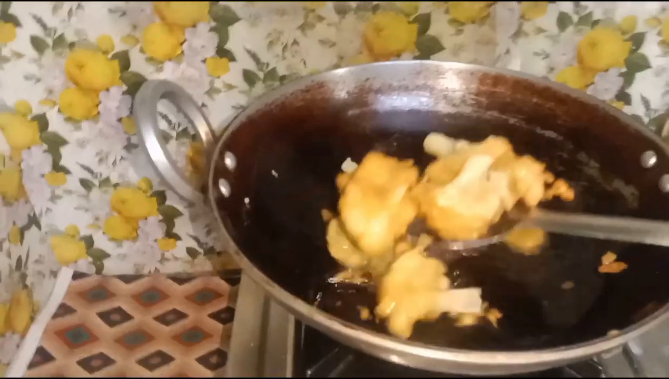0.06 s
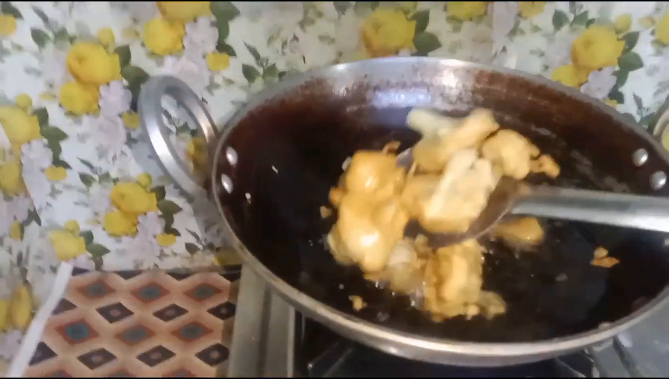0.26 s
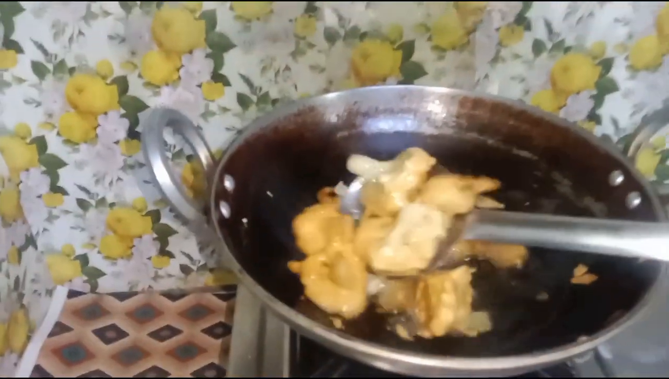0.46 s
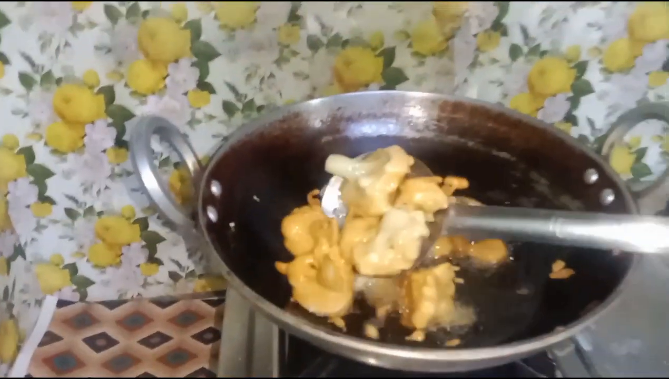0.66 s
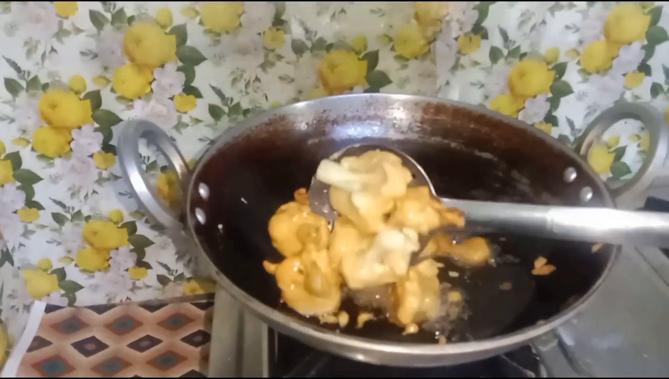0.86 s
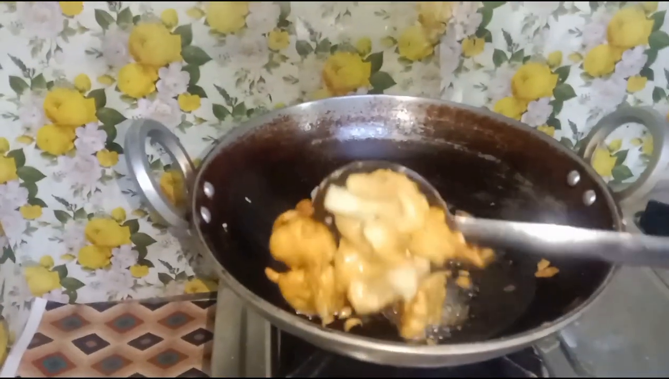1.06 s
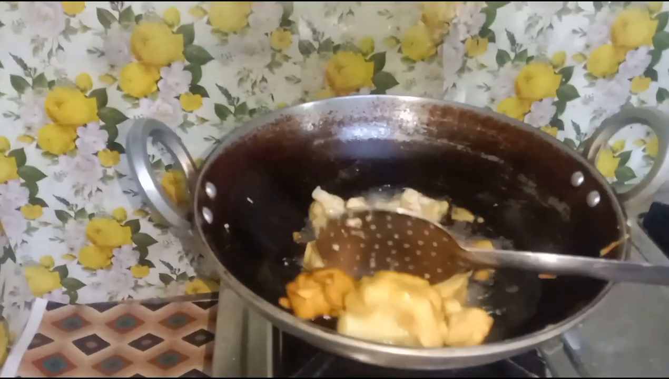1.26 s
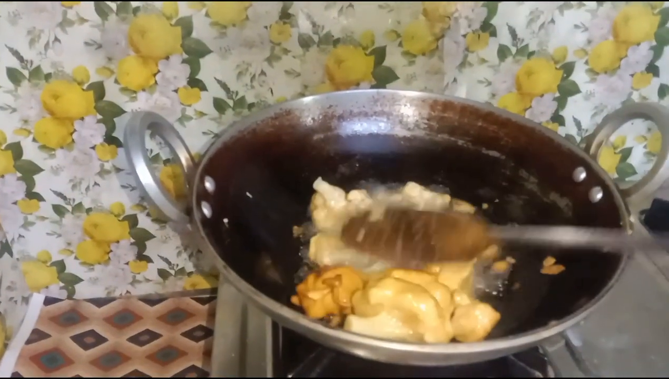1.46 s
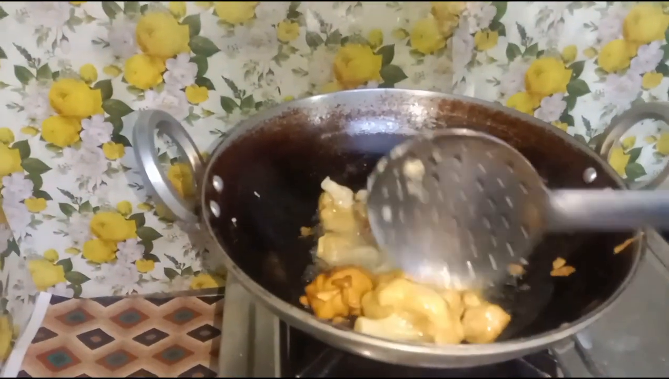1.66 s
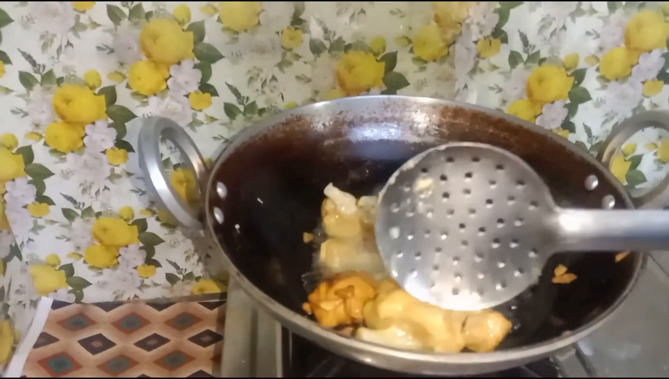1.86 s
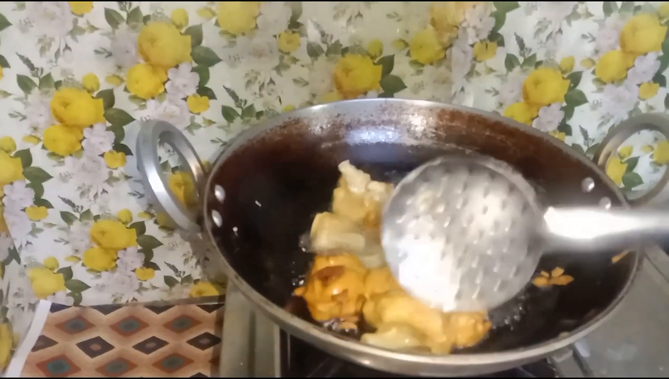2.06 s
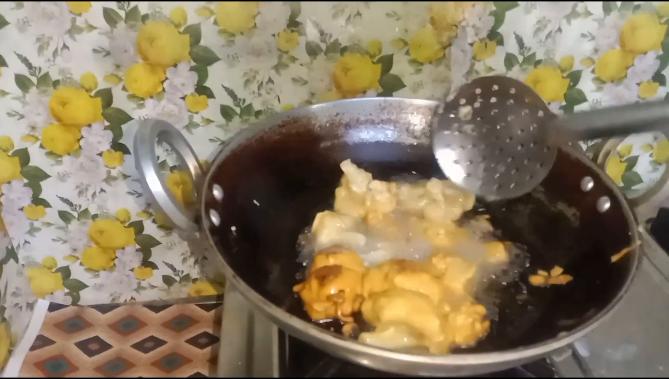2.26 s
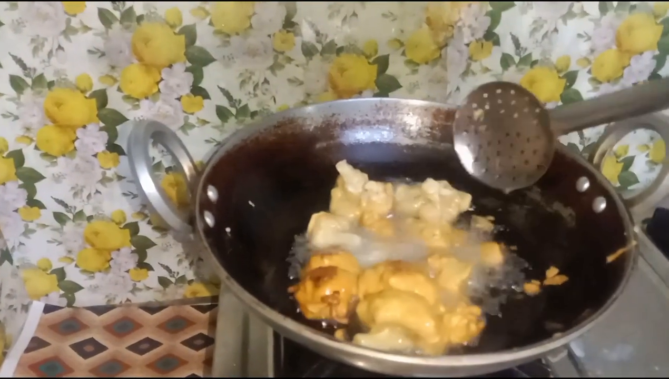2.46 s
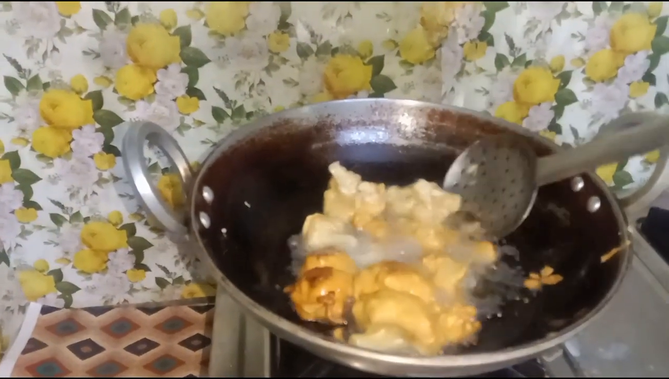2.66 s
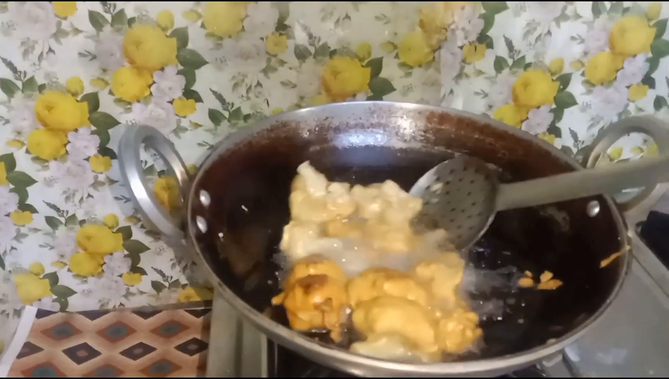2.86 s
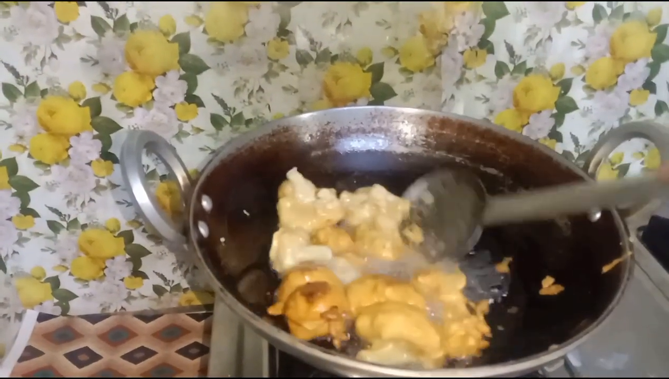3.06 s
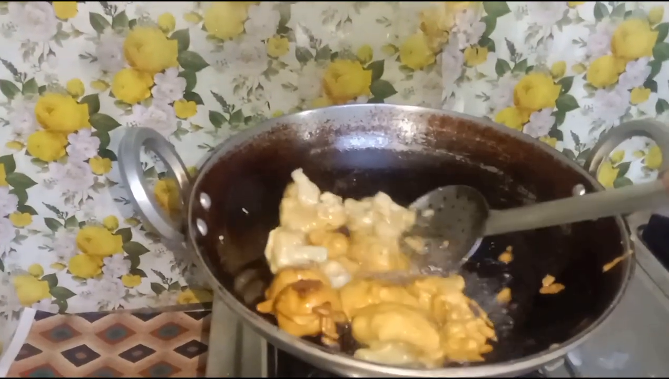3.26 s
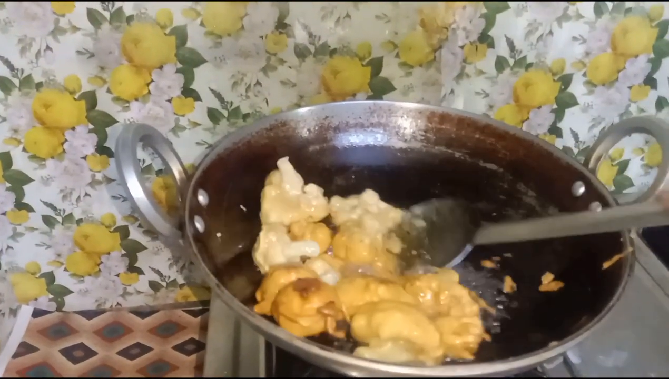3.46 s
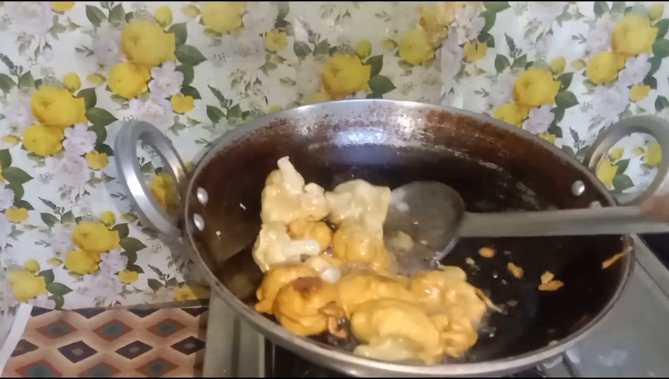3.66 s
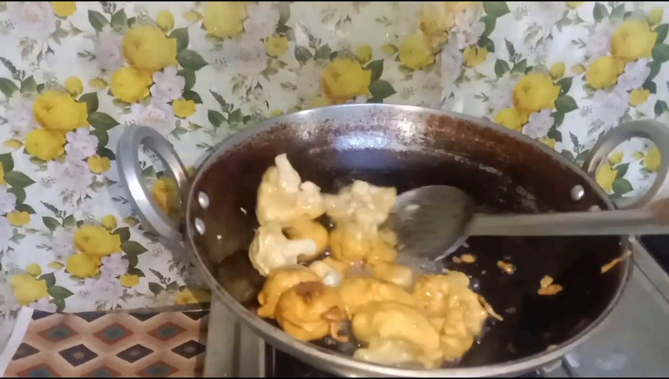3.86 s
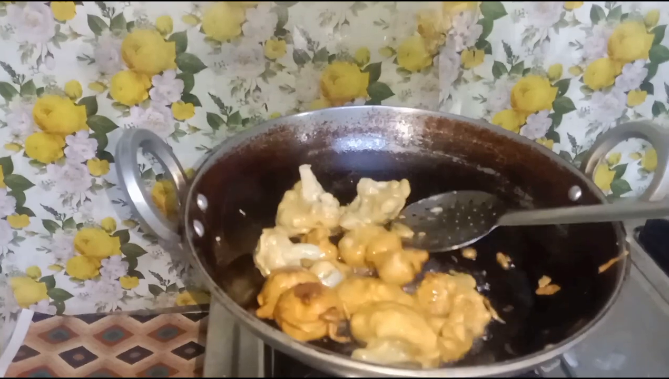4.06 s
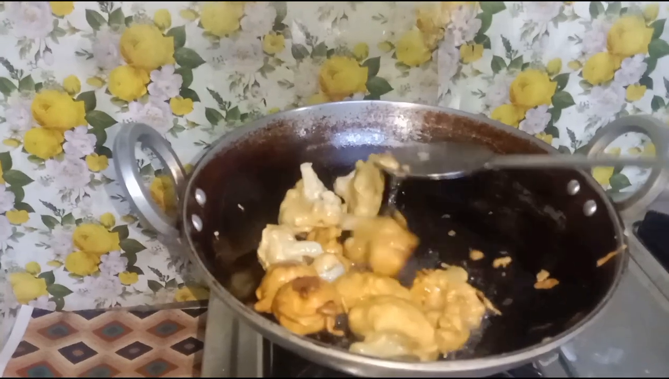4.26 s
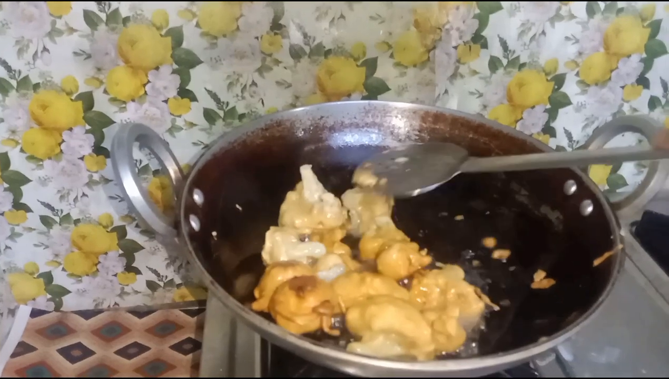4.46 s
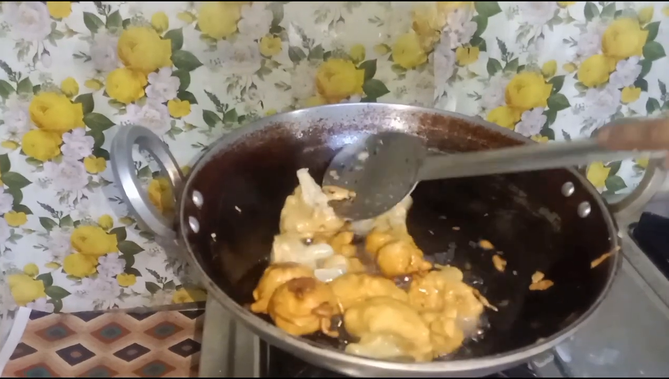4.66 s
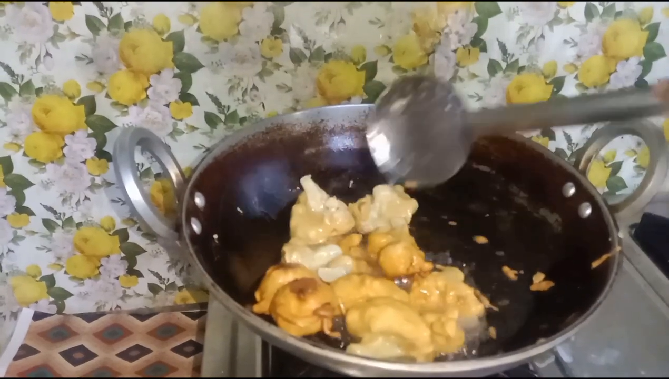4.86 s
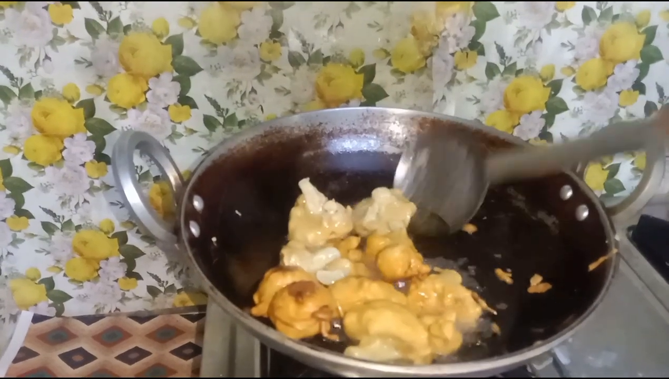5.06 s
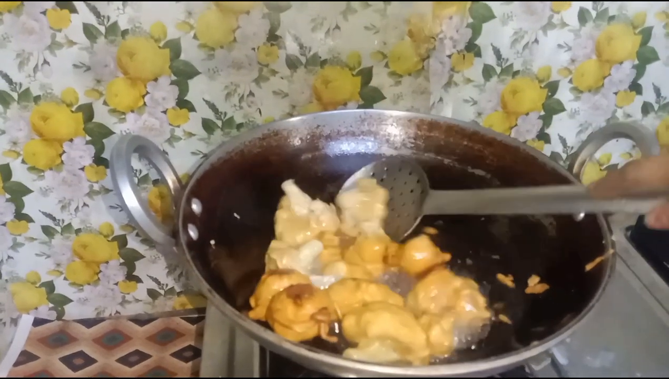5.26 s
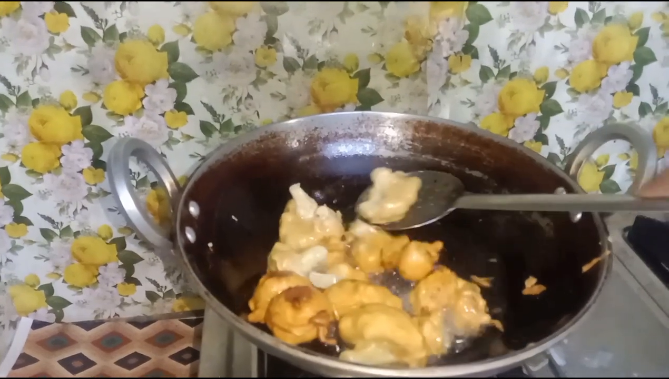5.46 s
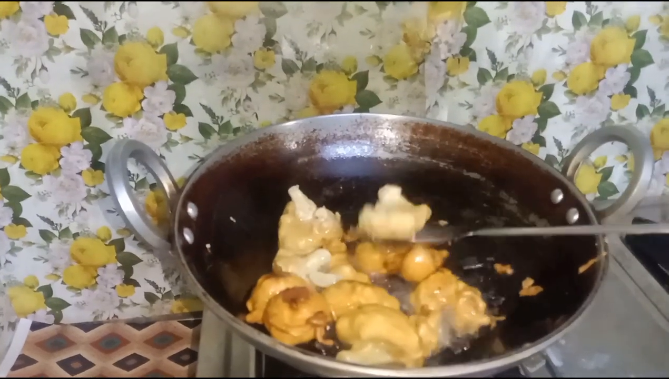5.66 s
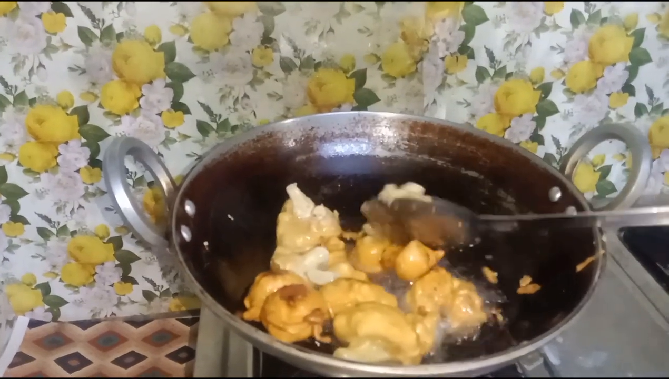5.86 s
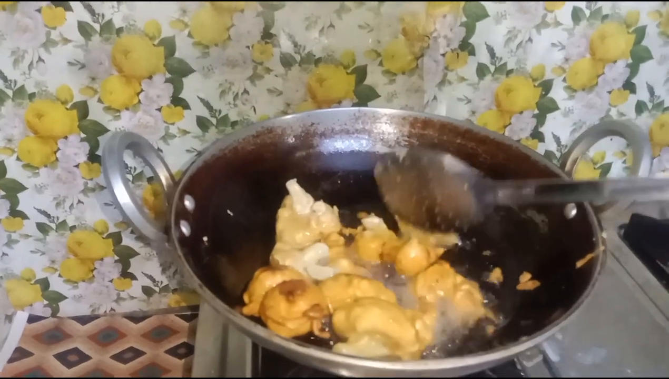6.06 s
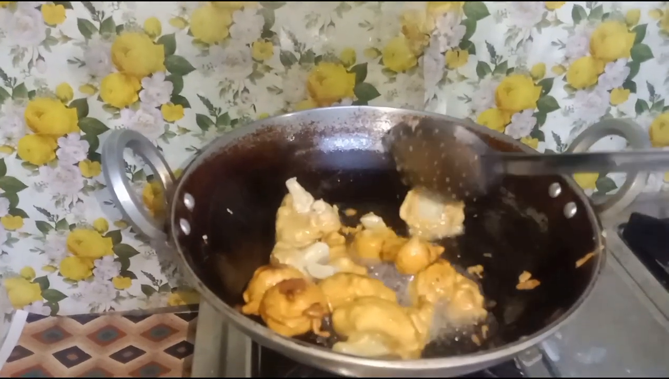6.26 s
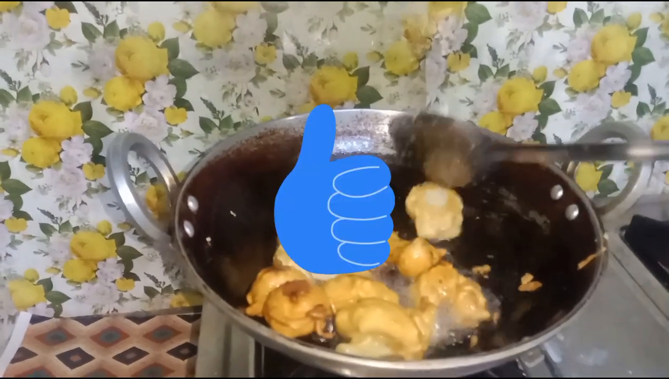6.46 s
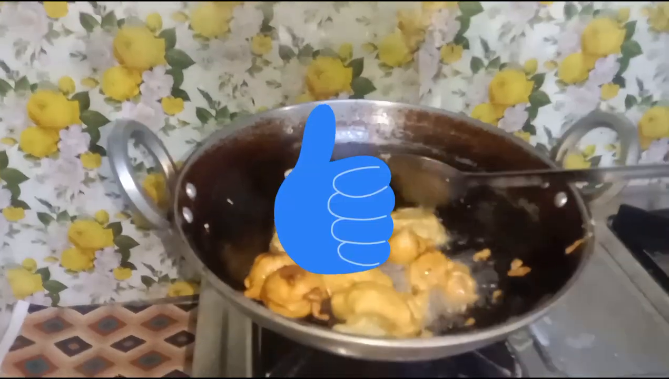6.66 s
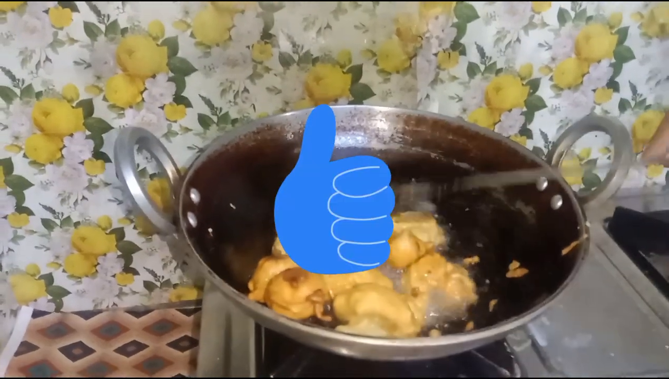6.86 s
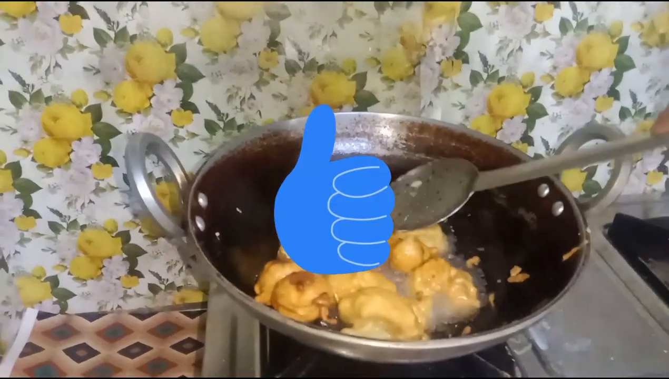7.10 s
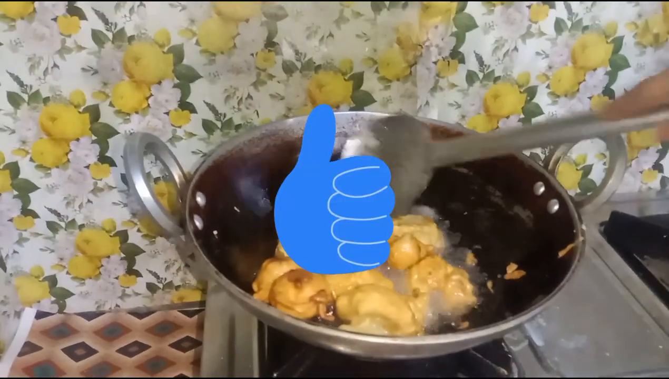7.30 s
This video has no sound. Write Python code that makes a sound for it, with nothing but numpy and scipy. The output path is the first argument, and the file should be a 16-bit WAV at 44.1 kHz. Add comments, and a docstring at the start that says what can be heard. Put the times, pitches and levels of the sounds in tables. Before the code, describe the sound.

Close to a frying wok in a small quiet kitchen: light fizzing and single bubble pops at first, small ladle ticks, then a sudden plunge of wet batter with a gulping, falling gurgle. The frying grows dense and crisp, then holds steady, with uneven bubbling, snapping droplets, soft steel scraping and one thin metallic ting as the ladle moves through the oil.

```python
"""Deep-frying in a steel wok

Battered pieces fry on a kitchen stove, stirred with a slotted ladle. Bubbles pop in calm oil,
then the food slides in with a burst and the sizzle swells. Fizz, boil and gurgle are swarms of
short decaying rings with echoes; larger pops, gulps and spits come one by one over a noise haze.
Ladle strokes stir up gurgles, scrapes and hums from resonant modes; filtered noise is the room tone."""
import sys
import numpy as np
from scipy import signal
from scipy.io import wavfile

SR = 44100
rng = np.random.default_rng(int(sys.argv[2]) if len(sys.argv) > 2 else 0)


def inscribe(sig):
    """Save sig as 16-bit PCM at rate SR to the path in sys.argv[1].

    A 1-D sig is mono; a 2-D sig holds one channel per row.
    Samples are clipped to [-1, 1] before scaling.
    """
    pcm = np.round(np.clip(np.atleast_2d(sig).T, -1, 1) * 32767)
    wavfile.write(sys.argv[1], SR, pcm.astype(np.int16))


N = 323253
TIME = np.arange(N) / SR  # s

# kitchen rumble: [t/s, level/dB], and its colour: [f/Hz, level/dB]
ROOM_LEVEL = [(0, -81), (0.8, -81.5), (1.2, -77.5), (1.5, -75), (7.33, -71)]
ROOM_COLOUR = [(20, -8), (55, -7), (95, 8.5), (140, -11), (176, 7.5), (220, 1), (400, -0.5), (700, 0),
               (1100, -1), (1600, -0.5), (6000, -71)]

# ladle bearing on the wok: [start t/s, length t/s, lowest mode level/dB, second mode level/dB]
RUBS = [(0.063, 0.25, -86, -92), (0.341, 0.044, -100, -67.5), (1.371, 0.075, -50, -70),
        (1.48, 0.052, -61, -83), (2.701, 0.072, -79, -57), (2.833, 0.026, -90, -68),
        (2.943, 0.062, -85, -57), (3.55, 0.044, -67.5, -89), (5.192, 0.013, -52, -59),
        (5.243, 0.03, -60, -54), (5.302, 0.015, -52, -60), (5.394, 0.028, -58, -68),
        (5.653, 0.065, -60, -98)]
# the two modes it sets humming: [f/Hz, width f/Hz]
RUB_MODES = [(176, 5.4), (336, 32)]
RUB_ATTACK_S, RUB_RELEASE_S = 0.032, 0.067  # time to rise and to fall by 20 dB

# strokes of the ladle: [start t/s, length t/s, gurgle level/dB, scrape level/dB], before each layer's trim
STROKES = [(0.076, 0.11, -75, -73), (0.285, 0.025, -65, -79), (0.49, 0.083, -103, -70.5),
           (1.218, 0.034, -64, -70), (1.64, 0.037, -61, -70), (1.922, 0.065, -68, -64),
           (2.397, 0.084, -63.5, -75), (2.696, 0.28, -59, -60.5), (3.06, 0.31, -50.5, -64),
           (3.41, 0.32, -50, -52.5), (3.802, 0.19, -60, -58), (4.103, 0.15, -54, -54),
           (4.46, 0.087, -60.5, -55.5), (4.712, 0.12, -56, -52), (5.125, 0.28, -59, -50),
           (5.627, 0.085, -59, -55), (6.015, 0.04, -65, -55.5), (6.138, 0.12, -65, -56.5),
           (6.772, 0.068, -68, -55), (7.0, 0.032, -77, -61)]
STROKE_ATTACK_S, STROKE_RELEASE_S = 0.074, 0.043  # time to rise and to fall by 20 dB
# colour of the gurgle: [f/Hz, level/dB]
GURGLE_COLOUR = [(200, -14), (450, -9), (530, -14.5), (620, -8.5), (780, 10), (900, -12.5), (1020, 4),
                 (1120, -4), (1400, -4), (2500, -57)]

# wok modes that sing: [f/Hz, level/dB before tilt, t60 t/s]
SINGING_MODES = [(802.4, -1.5, 0.14), (1010, -11, 0.14), (1170, -9.5, 0.06), (1350, 5, 0.12),
                 (1860, -0.5, 0.044), (2140, -2, 0.089)]
STEEL_WAVER_DB = 5.5  # spread of each mode's swelling and fading under the bubbles
# wok modes rung by a knock: [f/Hz, level/dB, t60 t/s]
KNOCK_MODES = [(690, -10, 0.051), (798, 3.5, 0.086), (1210, 6.5, 0.048), (1344, 11.5, 0.05),
               (1660, 2, 0.12), (1870, 17, 0.0093), (2220, -4, 0.26), (2650, 15.5, 0.019)]
# ladle knocking on the wok: [t/s, peak level/dB of the ring]
KNOCKS = [(0.294, -43.5), (0.5885, -35.5), (1.338, -37)]
# blade modes of the ladle: [f/Hz, level/dB, t60 t/s]
LADLE_MODES = [(6700, -3, 0.02), (7500, -1, 0.022), (8150, -2, 0.018), (10890, -7.5, 0.045)]
# the ladle's rim skids on the steel with a thin ting
TING_S, TING_DB, SKID_S = 4.1662, -20, 0.004
# wok resonances laid over every coloured sound: [f/Hz, width f/Hz, boost level/dB]
WOK_RESONANCES = [(810, 26, 3.5), (1190, 38, 3), (1342, 55, 3), (1880, 110, 2), (2052, 38, 2),
                  (2136, 43, 3.5), (2680, 48, 2.5), (3390, 60, 3), (3580, 80, 2), (3754, 65, 3),
                  (4147, 70, 2), (4295, 22, 3.5), (5156, 32, 3), (7516, 80, 2)]

# colour of the crumbs' crackle: [f/Hz, level/dB]
CRUMB_COLOUR = [(1500, -27), (2500, -24), (3300, -5), (8700, -1), (9300, -7), (12800, -15), (15300, -12)]
# sharp spits of oil: [t/s, peak level/dB], and their colour: [f/Hz, level/dB]
SPITS = [(2.1609, -18.5), (2.2738, -13), (2.3665, -19), (2.4208, -19), (5.7339, -12.5), (5.9455, -21),
         (6.9972, -15)]
SPIT_COLOUR = [(800, -20.5), (2500, -7), (5000, 7), (8500, 10.5), (9500, -1), (12000, -6), (15500, -5)]
# largest pockets of steam gulping under food and ladle: [t/s, peak level/dB, pitch f/Hz]
GULPS = [(1.375, -47, 1135), (1.4, -47, 1030), (2.375, -53, 1004), (2.785, -58, 730), (2.725, -55, 735),
         (2.9, -53, 1000), (3.055, -57, 700), (3.15, -53, 720), (3.225, -56, 700), (3.275, -57, 447),
         (3.29, -55, 693), (3.3, -46.5, 1000), (3.335, -61, 557), (3.41, -55, 754), (3.46, -50, 990),
         (3.49, -58, 608), (3.56, -57, 690), (3.645, -49.5, 593), (3.69, -56, 607), (3.85, -58, 980),
         (4.22, -48, 1094), (4.23, -59, 690), (4.25, -62, 443), (4.49, -53.5, 698), (4.535, -52.5, 762),
         (4.55, -59, 1010), (4.665, -54, 966), (5.591, -46, 1050), (5.615, -57, 930), (5.645, -50, 796),
         (6.12, -55, 1060), (6.225, -59, 795)]
# largest bubbles bursting: [t/s, level/dB of the onset before trim and colour, pitch f/Hz]
POPS = [(0.083, -39, 2710), (0.118, -25, 5150), (0.2266, -33.5, 3200), (0.2733, -35.5, 4200),
        (0.292, -33.5, 3540), (0.338, -33, 6860), (0.4493, -35.5, 4500), (0.639, -29, 4360),
        (0.645, -29, 4470), (0.811, -46, 3500), (0.8787, -27, 4000), (0.938, -34.5, 6640),
        (1.0668, -34.5, 7500), (1.144, -31.5, 2760), (1.194, -25.5, 4570), (1.212, -28.5, 5170),
        (1.2323, -30.5, 5500), (1.323, -37, 4300), (1.342, -21.5, 3730), (1.3733, -17.5, 4230),
        (1.395, -21.5, 6840), (1.429, -18, 4500), (1.468, -23, 2650), (1.507, -22.5, 5400),
        (1.532, -23, 7200), (1.684, -29, 2980), (1.702, -28.5, 5940), (1.787, -32, 2900),
        (1.9025, -31, 6100), (1.9224, -23, 4240), (2.055, -31, 5200), (2.16, -17.5, 2950),
        (2.471, -25, 4840), (2.5007, -28, 7400), (2.521, -23, 3770), (2.623, -23, 3500), (2.659, -25, 7600),
        (2.7944, -25, 4620), (2.829, -26, 3500), (2.9328, -24, 3900), (3.033, -28, 3010),
        (3.278, -23.5, 4580), (3.34, -28, 2690), (3.375, -21, 4000), (3.391, -21, 4400), (3.455, -24, 3430),
        (3.5508, -18, 2610), (3.669, -24.5, 3480), (3.736, -25, 3850), (3.904, -25, 5360),
        (3.968, -27.5, 3440), (4.063, -24.5, 3540), (4.384, -27, 7650), (4.404, -28, 2640),
        (4.544, -26, 3120), (4.654, -28, 3580), (4.709, -24.5, 3770), (4.728, -20.5, 3530),
        (4.91, -28, 3240), (4.9973, -26, 4520), (5.164, -22.5, 3260), (5.1933, -23.5, 4600),
        (5.3292, -19, 4450), (5.359, -24.5, 4550), (5.442, -30, 3460), (5.5112, -24, 2220),
        (5.5274, -23.5, 2120), (5.574, -27.5, 4580), (5.6468, -17.5, 2720), (5.7, -26, 3500),
        (5.9452, -20, 3700), (6.173, -28, 3520), (6.339, -29, 2600), (6.4416, -24, 2780),
        (6.664, -28, 2620), (6.709, -25, 5260), (6.802, -23, 4000), (6.82, -28, 3100), (6.8785, -25, 6760),
        (6.948, -24.5, 5260), (6.996, -26.5, 2480), (7.131, -27, 3600), (7.1497, -20.5, 4580)]
# colour of pops and knock ticks: [f/Hz, level/dB]
POP_COLOUR = [(1000, -1.5), (8800, -0.5), (9300, -12), (15000, 0)]

# larger bubbles round the food: [t/s, level/dB], and their colour: [f/Hz, level/dB]
BOILING = [(1.3, -92), (1.38, -46.5), (1.7, -55.5), (2.0, -62.5), (2.3, -52), (2.44, -47), (2.53, -56),
           (2.7, -47.5), (3.0, -53), (3.15, -48), (4.2, -44.5), (4.35, -49), (4.45, -47.5), (5.0, -46),
           (5.8, -45.5), (6.25, -50), (6.55, -46.5), (7.33, -47)]
BOIL_COLOUR = [(600, -25), (980, -17), (1200, 1), (1550, 5.5), (2100, 7), (2700, 7), (3300, -1),
               (4000, -21), (8000, -45)]
BOIL_GUSH_DB = 6  # how unevenly the largest of them come
# how hard the oil works: [t/s, level/dB of the fizz before trim]
FRYING = [(0.0, -66.5), (0.06, -52.5), (0.3, -49), (0.4, -58), (0.75, -55.5), (1.05, -54.5), (1.23, -48.5),
          (1.29, -51), (1.34, -49), (1.43, -38.5), (1.75, -44), (2.12, -41), (2.3, -36), (2.63, -33.3),
          (2.88, -32.3), (3.2, -34.5), (3.8, -36), (4.1, -36), (4.59, -37), (5.41, -35), (6.0, -37.5),
          (6.65, -36), (7.33, -37)]
# colour of the fizz: [f/Hz, level/dB]
FIZZ_COLOUR = [(1000, -74), (2200, -15.5), (2650, -9), (3100, -3), (3600, -3), (5100, -0.5), (6200, -3),
               (7400, 0.5), (8850, -4), (9200, -13.5), (10400, -12), (11500, -17.5), (12700, -13.5),
               (13900, -20), (15300, -12.5)]

# wet batter slides in: the burst starts at once, swells to its top and dies away
PLUNGE_S, PLUNGE_SWELL_S = 1.324, 0.098
PLUNGE_RISE_DB_PER_S, PLUNGE_FALL_DB_PER_S = 168, 235
EDGE_HZ = 15700  # top of the audible band


def gain_of(db):
    """Decibels to amplitude."""
    return 10 ** (np.asarray(db) / 20)


def evened(x):
    """Scales to an rms of one."""
    return x / np.sqrt(np.mean(x ** 2) + 1e-20)


def level(rows):
    """Gain over time from a dB curve."""
    return gain_of(np.interp(TIME, *np.transpose(rows)))


def add(mix, s, sound):
    """Mixes a sound in at a time."""
    part = mix[max(round(s * SR), 0):][:len(sound)]
    part += sound[:len(part)]


def coloured(x, points, size=4096):
    """Minimum-phase filter with a given spectrum plus the resonances of the wok."""
    hz = abs(np.fft.fftfreq(size, 1 / SR))
    f, colour_db = np.transpose(points)
    db = np.interp(np.log(hz + 1), np.log(f), colour_db)
    for centre, width, boost in WOK_RESONANCES:
        db = db + boost / (1 + (2 * (hz - centre) / width) ** 2)
    log_spectrum = np.conj(signal.hilbert(np.log(gain_of(db))))
    taps = np.fft.ifft(np.exp(log_spectrum)).real
    return signal.oaconvolve(x, taps)[:len(x)]


def echoes(near_db, room_db, near_t60=0.059, room_t60=0.2, size=8000):
    """Direct sound, quick reflections from the wok and wall, then the kitchen's tail."""
    t = np.arange(size) / SR
    sparse = rng.standard_normal((2, size)) * (rng.random((2, size)) < .12) * (t > .0007)
    near = sparse[0] * 1e-3 ** (t / near_t60)
    room = sparse[1] * 1e-3 ** (t / room_t60)
    near = gain_of(near_db) * near / np.linalg.norm(near)
    room = gain_of(room_db) * room / np.linalg.norm(room)
    return (t == 0) + near + room


def bubble(hz, cycles, rise=0.025):
    """A bursting bubble: its cavity swells into a decaying ring, rising in pitch as it opens."""
    age = np.arange(0, 10, hz / cycles / SR)
    phase = 2 * np.pi * cycles * (age + rise * age ** 2 / 2)
    ring = age * np.exp(-age) * np.sin(phase)
    return ring / np.linalg.norm(ring)


def bursts(per_s, spread_db, limit=4):
    """Random impulses: many small ones and a few large."""
    draws, train = rng.random((int(per_s * N / SR), 3)), np.zeros(N)
    size = gain_of(spread_db * np.minimum(-np.log(1 - draws[:, 1]), limit))
    train[(draws[:, 0] * N).astype(int)] = size * np.sign(draws[:, 2] - .5)
    return train


def surge(depth_db, per_s):
    """Uneven gushes: a random gain that wanders smoothly in dB."""
    knots = rng.standard_normal(2000)
    return gain_of(depth_db * np.interp(TIME * per_s, np.arange(len(knots)), knots))


def swarm(per_s, spread_db, cycles, low_hz, high_hz, near_db, room_db,
          gush_db=0, gush_per_s=10, count=28):
    """Bubbles of many sizes, each size with its own echoes and gushes, the largest most unevenly."""
    out = np.zeros(N)
    for hz in np.linspace(low_hz, high_hz, count):
        grain = evened(signal.fftconvolve(bubble(hz, cycles), echoes(near_db, room_db)))
        gushes = surge(gush_db * (low_hz / hz) ** .8, gush_per_s)
        train = bursts(per_s / count, spread_db) * evened(gushes)
        out += signal.oaconvolve(train, grain)[:N]
    return evened(out)


def scatter(drive, over_db, spread_db, low_hz, high_hz, count):
    """Chance bubbles (t/s, level/dB, pitch f/Hz), one per equal stretch, their level following a drive."""
    when, size, pitch = rng.random((count, 3)).T
    s = (np.arange(count) + when) * N / SR / count
    db = 20 * np.log10(np.interp(s, TIME, drive)) + over_db - spread_db * size
    return list(zip(s, db, low_hz * (high_hz / low_hz) ** pitch))


def gesture(start, length, attack_s, release_s):
    """Gain over time of one move of the ladle: it rises, holds and dies away."""
    early = np.maximum(start - TIME, 0)
    late = np.maximum(TIME - start - length, 0)
    return gain_of(-20 * np.minimum(early / attack_s + late / release_s, 10))


def stirring(axis):
    """How strongly the ladle moves the oil (axis 0) or scrapes the steel (axis 1)."""
    power = np.zeros(N)
    for s, length, *dbs in STROKES:
        power += (gain_of(dbs[axis]) * gesture(s, length, STROKE_ATTACK_S, STROKE_RELEASE_S)) ** 2
    return np.sqrt(power)


def bearing(axis):
    """How strongly the ladle drives one of the wok's two low modes."""
    return sum(gain_of(dbs[axis]) * gesture(s, length, RUB_ATTACK_S, RUB_RELEASE_S)
               for s, length, *dbs in RUBS)


def plunge():
    """Gain over time of the burst as the batter goes in, one at its top."""
    past_top = TIME - PLUNGE_S - PLUNGE_SWELL_S
    db = np.minimum(PLUNGE_RISE_DB_PER_S * past_top, -PLUNGE_FALL_DB_PER_S * past_top)
    return (TIME > PLUNGE_S) * gain_of(db)


def kitchen():
    """The faint rumble of the stove and the room, as coloured noise."""
    return evened(coloured(rng.standard_normal(N), ROOM_COLOUR)) * level(ROOM_LEVEL)


def thuds(thud_db=-12, low_hz=65, high_hz=300):
    """The wok jostles on its stand whenever the ladle bears on it: low-passed random knocks."""
    band = signal.butter(2, [low_hz, high_hz], "band", fs=SR, output="sos")
    jostle = evened(signal.sosfilt(band, bursts(per_s=380, spread_db=5.5)))
    return gain_of(thud_db) * jostle * bearing(axis=0)


def rubs(judder=0.27, slip_band=(.72, 1.3)):
    """Friction of the ladle keeps two low modes of the wok humming unevenly."""
    out = np.zeros(N)
    for k, (hz, width) in enumerate(RUB_MODES):
        # irregular slips make the phase of the mode wander
        r = np.exp(-np.pi * width / SR)
        noise = rng.standard_normal(N) + 1j * rng.standard_normal(N)
        drift = signal.lfilter([1], np.poly([r, r]), noise)
        steadied = drift / (abs(drift) + abs(drift).mean() / 10)
        hum = evened((steadied * np.exp(2j * np.pi * hz * TIME)).real)
        band = signal.butter(2, hz * np.array(slip_band), "band", fs=SR, output="sos")
        slips = signal.sosfilt(band, bursts(per_s=310, spread_db=2.5))
        out += (hum + judder * evened(slips)) * bearing(axis=k)
    return out


def steel(tilt_db, waver_db, size=6000):
    """Countless small taps keep the wok's modes ringing, each wavering by itself; tilt is per octave."""
    t, out = np.arange(size) / SR, np.zeros(N)
    for hz, db, t60 in SINGING_MODES:
        ring = gain_of(-60 * t / t60) * np.sin(2 * np.pi * hz * t)
        tapped = signal.oaconvolve(bursts(per_s=400, spread_db=3), ring)[:N]
        ringing = evened(tapped * surge(waver_db, per_s=11))
        out += gain_of(db + tilt_db * np.log2(hz / SINGING_MODES[0][0])) * ringing
    return evened(out)


def singing(singing_db=-22, scrape_db=-2):
    """The wok sings faintly under the bursting bubbles, and lower and louder where the ladle scrapes it."""
    bubbled = gain_of(singing_db) * level(FRYING) * steel(tilt_db=12, waver_db=STEEL_WAVER_DB)
    waves = evened(surge(depth_db=2, per_s=14))
    scraped = gain_of(scrape_db) * stirring(axis=1) * steel(tilt_db=-2.0, waver_db=2.0)
    return bubbled * waves + scraped


def knocks(tick_db=1, contact_s=0.0006, size=12000):
    """The ladle's edge ticks on the steel and rings the wok, damped by the oil."""
    out, t = np.zeros(N), np.arange(size) / SR
    for s, peak_db in KNOCKS:
        ring = np.zeros(size)
        for hz, db, t60 in KNOCK_MODES:
            ring += gain_of(db) * 1e-3 ** (t / t60) * np.sin(2 * np.pi * (hz * t + rng.random()))
        ring = signal.fftconvolve(ring * np.minimum(t / contact_s, 1), echoes(near_db=-2, room_db=1))
        tick = coloured(echoes(near_db=-4, room_db=-12), POP_COLOUR)
        add(out, s, gain_of(peak_db) * ring / abs(ring).max())
        add(out, s, gain_of(peak_db + tick_db) * tick / abs(tick).max())
    return out


def ting(skid_db=1.5, size=6000):
    """A short skid of tiny slips rings the thin blade of the ladle."""
    out, t = np.zeros(N), np.arange(size) / SR
    slips = rng.standard_normal(size) * t / SKID_S * np.exp(-2 * t / SKID_S)
    hiss = np.diff(slips, prepend=0)  # differencing brightens the slips
    ring = np.zeros(size)
    for hz, db, t60 in LADLE_MODES:
        ring += gain_of(db - 60 * t / t60) * np.sin(2 * np.pi * (hz * t + rng.random()))
    ring = ring * np.minimum(t / SKID_S, 1)
    blade = ring / abs(ring).max() + gain_of(skid_db) * hiss / abs(hiss).max()
    add(out, TING_S, gain_of(TING_DB) * blade)
    return out


def stir(ladle, stir_db=-6.5, plunge_db=-51):
    """Oil gurgles through the holes of the sliding ladle, and as the batter goes in."""
    gurgle = swarm(per_s=480, spread_db=2.6, cycles=11, low_hz=590, high_hz=1260,
                   near_db=-6, room_db=5, gush_db=5.5, gush_per_s=13, count=16)
    strength = np.hypot(gain_of(stir_db) * ladle, gain_of(plunge_db) * plunge())
    return evened(coloured(gurgle, GURGLE_COLOUR)) * strength


def crumbs(crumb_db=-61):
    """Stray crumbs of batter crackle one by one at a steady level, heard while the oil is still calm."""
    crackle = swarm(per_s=130, spread_db=5.5, cycles=0.5, low_hz=3800, high_hz=9000,
                    near_db=2, room_db=-8, count=10)
    return gain_of(crumb_db) * evened(coloured(crackle, CRUMB_COLOUR))


def spits():
    """Water droplets explode in the oil with a single sharp click."""
    out = np.zeros(N)
    for s, db in SPITS:
        click = coloured(echoes(near_db=0.5, room_db=-1, near_t60=0.06), SPIT_COLOUR)
        add(out, s, gain_of(db) * click / abs(click).max())
    return out


def sinking(first_s=1.355, gap_s=0.0059, first_db=-51, fade_db=1.03,
            top_hz=850, fall=0.06, scatter_share=0.24, count=17):
    """Sinking batter traps ever larger pockets: a ragged falling run (t/s, peak level/dB, pitch f/Hz)."""
    rows = []
    for k, (late, off) in enumerate(rng.uniform(-0.99, 1, (count, 2))):
        hz = top_hz * np.exp(scatter_share * off - k * fall)
        rows.append((first_s + (k + late) * gap_s, first_db - k * fade_db, hz))
    return rows


def gulps(ladle, cycles=8):
    """Big pockets of steam wobble free with a low blip; lesser ones follow the ladle."""
    out = np.zeros(N)
    lesser = scatter(ladle, over_db=1.5, spread_db=6.0, low_hz=696, high_hz=1083, count=60)
    for s, db, hz in GULPS + sinking() + lesser:
        blip = bubble(hz, cycles, rise=0.0029)
        blip = signal.fftconvolve(blip, echoes(near_db=-7.5, room_db=-3.5))
        add(out, s, gain_of(db) * blip / abs(blip).max())
    return out


def pops(pop_db=-9, fade_db=3.5, crack=0.9, cycles=1.7, gap=0.003,
         detuning=0.088, climb=0.033, count=4, size=440):
    """A large bubble cracks open and sets off its neighbours: a quick cluster of rings climbing in pitch."""
    out = np.zeros(N)
    # lesser pops follow the fizz
    lesser = scatter(level(FRYING), over_db=4, spread_db=7, low_hz=3430, high_hz=7950, count=36)
    for s, db, hz in POPS + lesser:
        pop = np.zeros(SR // 4)
        for k, (late, detune) in enumerate(rng.uniform(-1, 1, (count, 2))):
            ring_hz = hz * (1 + climb * (k - 1) + detuning * k * detune)
            ring = np.pad(bubble(ring_hz, cycles), (0, 128))
            add(ring, 0, crack * bubble(0.86 * hz, 0.17))
            ring = signal.fftconvolve(ring, echoes(near_db=1.5, room_db=-2.5))
            add(pop, gap * (k + late / 2 * (k > 0)), gain_of(-fade_db * k) * ring)
        # the cavity radiates little below its own pitch
        pop = signal.sosfilt(signal.butter(8, .74 * hz, "high", fs=SR, output="sos"), pop)
        # its strength is the power of the first hundredth of a second
        add(out, s, gain_of(db + pop_db) * pop / pop[:size].std())
    return coloured(out, POP_COLOUR)


def boil(ladle, stirred_db=5, plunge_db=-42):
    """Larger bubbles around the food come in waves as the batter heats; the ladle shakes more loose."""
    large = swarm(per_s=2600, spread_db=2.6, cycles=3.23, low_hz=1165, high_hz=4000,
                  near_db=2, room_db=2.5, gush_db=BOIL_GUSH_DB, gush_per_s=20, count=20)
    drives = [level(BOILING), gain_of(stirred_db) * ladle, gain_of(plunge_db) * plunge()]
    return evened(coloured(large, BOIL_COLOUR)) * np.linalg.norm(drives, axis=0)


def fizz(tick_db=-8.0, haze_db=-6, fizz_db=0.18, plunge_db=-27):
    """Small bubbles and dry ticks over a noise haze of countless tiny ones."""
    small = swarm(per_s=2600, spread_db=4.4, cycles=1.53, low_hz=2370, high_hz=13630,
                  near_db=1, room_db=0.5, gush_db=3, gush_per_s=54, count=44)
    haze = gain_of(haze_db) * rng.standard_normal(N)
    ticks = gain_of(tick_db) * evened(bursts(per_s=420, spread_db=5.0))
    froth = (small + haze + ticks) * surge(depth_db=1.3, per_s=60) * surge(depth_db=.5, per_s=9)
    strength = np.hypot(gain_of(fizz_db) * level(FRYING), gain_of(plunge_db) * plunge())
    return evened(coloured(froth, FIZZ_COLOUR)) * strength


def scene():
    """Room, ladle work and frying oil summed to one channel."""
    ladle = stirring(axis=0)
    handling = thuds() + rubs() + knocks() + ting() + stir(ladle)
    oil = singing() + crumbs() + spits() + gulps(ladle) + pops() + boil(ladle) + fizz()
    return (kitchen() + handling + oil)[None]


def record(dry):
    """Cuts the treble above the band edge with a steep linear-phase low-pass."""
    taps = signal.firwin(511, EDGE_HZ, window=("kaiser", 9), fs=SR)
    return signal.oaconvolve(dry, taps[None], "same")


dry = scene()
out = record(dry)
inscribe(out)
```